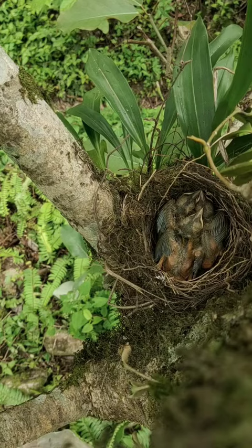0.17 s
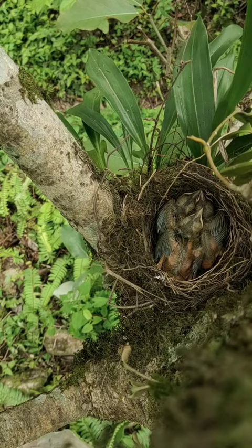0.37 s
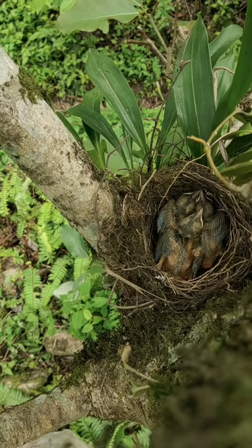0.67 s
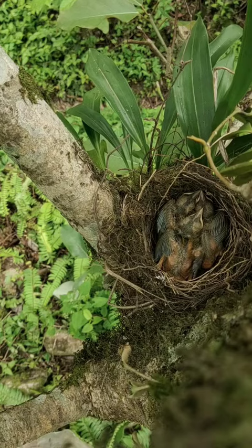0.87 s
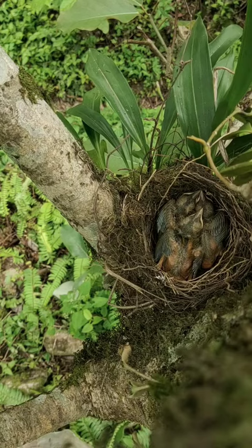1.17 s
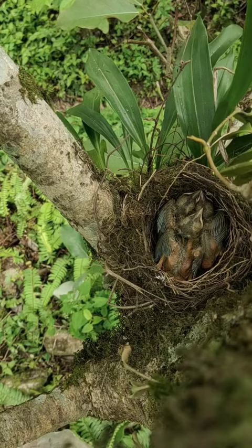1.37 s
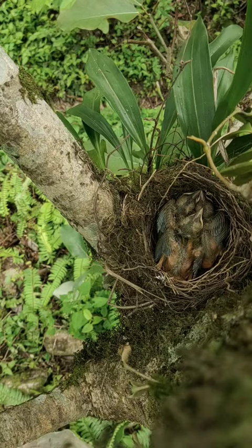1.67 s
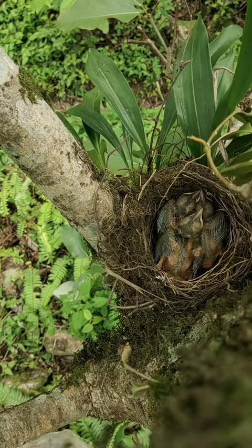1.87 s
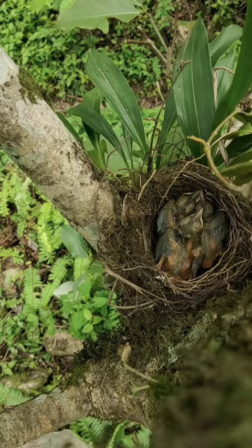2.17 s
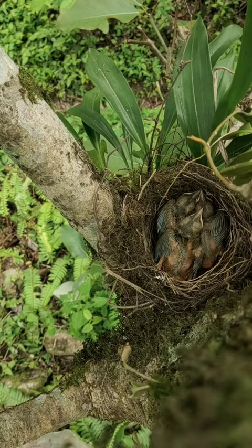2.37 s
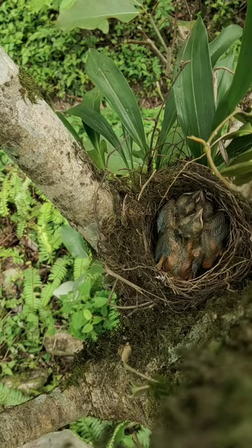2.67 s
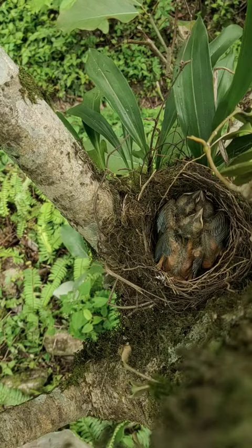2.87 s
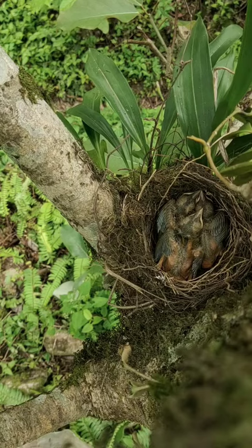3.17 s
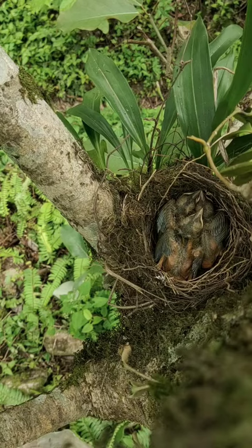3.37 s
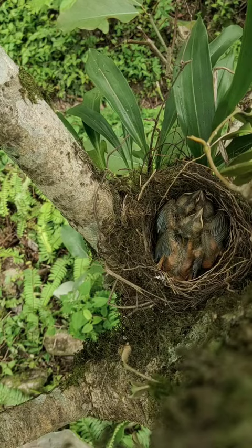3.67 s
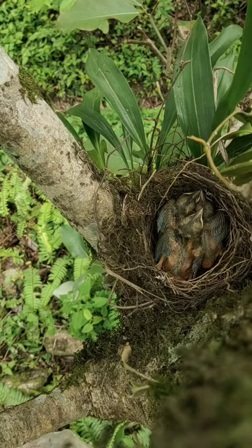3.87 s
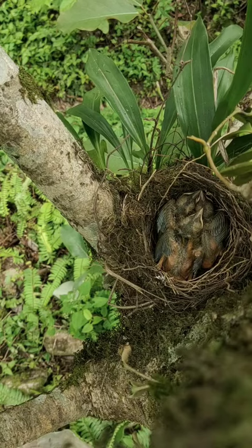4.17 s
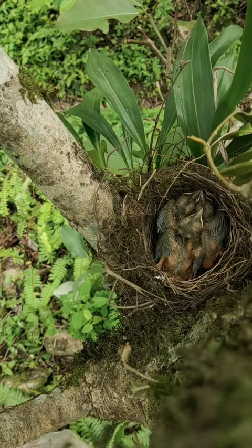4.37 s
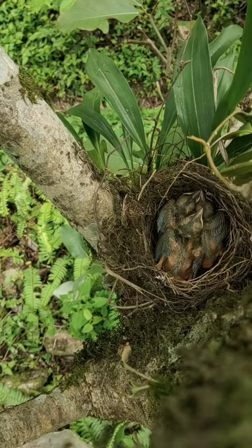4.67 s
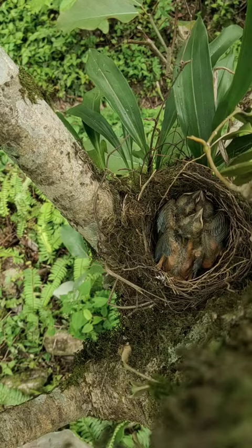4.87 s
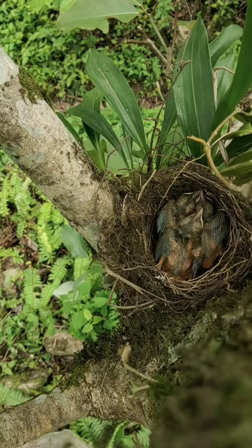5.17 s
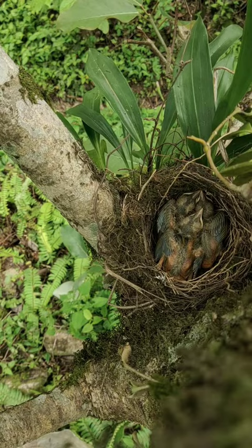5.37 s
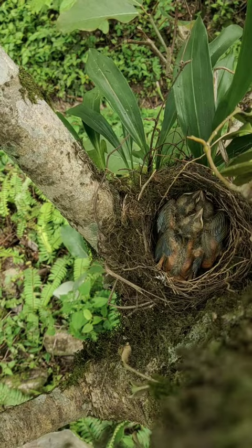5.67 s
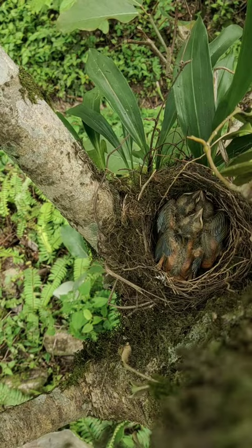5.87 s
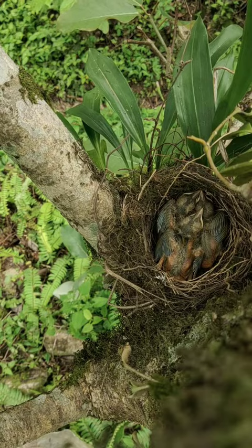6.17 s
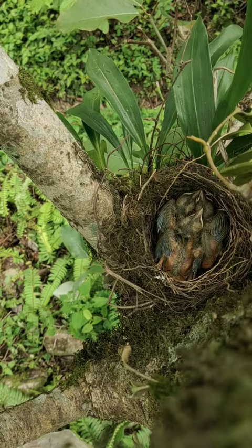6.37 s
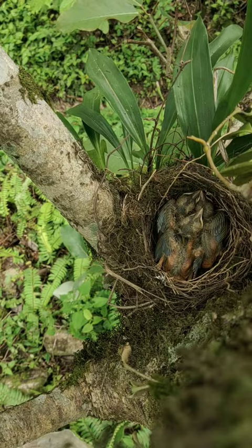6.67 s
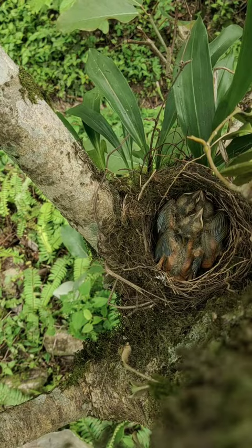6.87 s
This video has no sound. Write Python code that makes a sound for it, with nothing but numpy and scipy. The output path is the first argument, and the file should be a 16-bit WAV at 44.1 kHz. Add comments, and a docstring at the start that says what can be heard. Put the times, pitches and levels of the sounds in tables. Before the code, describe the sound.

Clear, liquid birdsong with burry notes and a thin buzz rings through echoing woodland, with faint distant birds, soft coos and dull rumble beneath.

```python
"""Songbird among echoing trees

A thrush-like bird sings whistled, warbled and buzzed notes, made from gliding tones with a swinging pitch.
Trees answer with a long echo of many random reflections; other birds call faintly further off.
Under them lie a dull rumble of filtered noise with a wavering hum, low coos and a thin pure drone.
There are also brief rustles of grainy noise and runs of very low throbs about four times a second."""
import sys
import numpy as np
from scipy import signal
from scipy.io import wavfile

SR = 44100
rng = np.random.default_rng(int(sys.argv[2]) if len(sys.argv) > 2 else 0)


def to_wav(sig):
    """Store sig (one row per channel, or 1-D mono) as 16-bit WAV at the path in sys.argv[1].

    Samples outside -1..1 are clipped; the rate is SR.
    """
    pcm = np.clip(np.atleast_2d(sig), -1, 1) * 32767
    pcm = np.round(pcm).astype(np.int16)
    wavfile.write(sys.argv[1], SR, pcm.T)  # frames by channels


N = 309141
TIME = np.arange(N) / SR
LEFT_RIGHT = np.array([[1], [-1]])   # opposite signs for the two ears


def amp(db):
    """Turns decibels into gain."""
    return 10 ** (np.asarray(db) / 20)


def rms_one(x):
    """Scales a sound to unit power."""
    return x / np.sqrt(np.mean(x ** 2) + 1e-20)


def at_time(points, seconds):
    """Reads a level curve at the given times."""
    return np.interp(seconds, *np.transpose(points))


def at_hz(points, hz):
    """Reads a spectrum on a log-frequency axis."""
    table_hz, values = np.transpose(points)
    return np.interp(np.log(hz), np.log(table_hz), values)


def lean_gain(db):
    """Gains for the two ears that make the left louder than the right by db."""
    return amp(db / 2 * LEFT_RIGHT)


def stereo(mid, side, alike):
    """Mixes two independent noises so that left and right are alike by the given share."""
    return np.sqrt(1 + alike) * mid + np.sqrt(1 - alike) * side * LEFT_RIGHT


def low_pass(x, hz):
    """Keeps the sound below hz."""
    return signal.sosfilt(signal.butter(2, hz, fs=SR, output="sos"), x)


def drift(rate, size=N):
    """Smooth random wander of spread 1 that changes about rate times a second."""
    r = np.exp(-2 * np.pi * rate / SR)
    noise = rng.standard_normal(size + 9000)
    return rms_one(signal.lfilter([1], [1, -2 * r, r * r], noise)[9000:])   # skips the filter's start


def shaped(rows, shape):
    """Spells out notes: pitch bends through three values; level attacks, swells to a peak, fades, releases."""
    attack, release, edge_db, swell_db, fade_db = shape
    notes = []
    u = np.linspace(0, 1, 41)   # position within the note
    for start, length, first, middle, last, db, share, depth in rows:
        hz = np.polyval(np.polyfit([0, .5, 1], [first, middle, last], 2), u)
        swell = swell_db * (1 - u / share) ** 2
        fade = fade_db * ((u - share) / (1 - share)) ** 2
        level = db - np.where(u < share, swell, fade)
        attack_dip = np.clip(1 - u * length / attack, 0, 1)
        release_dip = np.clip(1 - (1 - u) * length / release, 0, 1)
        level = level - edge_db * (attack_dip + release_dip)
        notes.append(np.transpose([start + u * length, hz, level, depth + 0 * u]))
    return notes


def span(rows):
    """Gives a note's sample range, its columns drawn out in time, and soft edges."""
    s, *columns = np.transpose(rows)
    where = slice(int(s[0] * SR), min(int(s[-1] * SR), N))
    t = TIME[where]
    edge = np.clip(np.minimum(t - s[0], s[-1] - t) / 0.0013, 0, 1)
    return where, [np.interp(t, s, c) for c in columns], edge


# What the open beak adds to each overtone's level: (frequency [Hz], level change [dB])
BEAK_GAIN = [(3000, -15.5), (4500, -13), (5500, -10), (7000, -2.5), (10000, 5.5)]


def whistle(notes, warble_hz, unsteady, overtones_db, rasp):
    """A membrane near a pure tone; its tension wobbles, which swings the pitch up and down."""
    out = np.zeros(N)
    for rows in notes:
        where, (hz, db, depth), edge = span(rows)
        turn = np.cumsum(warble_hz * (1 + unsteady * drift(30, size=len(hz)))) / SR
        # slow one way, quick back; a negative depth turns it upside down
        swing = signal.sawtooth(2 * np.pi * turn, .7)
        swing = swing + rasp * np.tanh(drift(417, size=len(hz)))   # fast uneven flutter roughens a trill
        phase = 2 * np.pi * np.cumsum(hz + depth * swing) / SR
        tone = np.sin(phase)
        for k, overtone_db in enumerate(overtones_db, 2):
            tone = tone + amp(overtone_db + at_hz(BEAK_GAIN, k * hz)) * np.sin(k * phase)
        out[where] += np.sqrt(2) * amp(db) * edge * tone
    return out


# Loudness of the background: (time [s], level [dB])
BACKGROUND_LEVEL = [(.035, -110), (.056, -63), (.062, -55), (2, -56.5), (4.05, -56), (4.3, -52), (5.5, -53),
                    (7, -52)]


def background():
    """Rumble and hum share one slowly changing loudness."""
    return amp(at_time(BACKGROUND_LEVEL, TIME)) * (rumble(patchy_db=0.9) + hum())


# Spectrum of the rumble, before it is scaled to unit power: (frequency [Hz], level [dB per Hz])
RUMBLE_SPECTRUM = [(21, -41.5), (35, -4.5), (49, -3), (202, -7.5), (343, -12), (492, -12), (656, -14),
                   (1010, -16.5), (1840, -32), (2460, -33), (3790, -30.5), (5560, -39), (10100, -44.5),
                   (10900, -24), (14200, -83), (22000, -120)]
# How alike the two ears are: (frequency [Hz], likeness [0 to 1])
RUMBLE_LIKENESS = [(60, 0.76), (130, 0.6), (260, 0.67), (550, 0.31), (1160, 0.58), (2430, 0.19), (5090, .3),
                   (10700, 0.63)]
# How much louder the left is: (frequency [Hz], left minus right [dB])
RUMBLE_LEAN = [(60, 5.5), (220, 3.5), (800, 1), (2920, 0.5), (10700, 0.0)]


def rumble(patchy_db):
    """Third-octave bands of noise, each with its own level, likeness and lean; all flicker together."""
    out = 0
    edges = 28 * 2 ** (np.arange(27) / 3)
    white = rng.standard_normal((2, 2, N))   # neighbouring bands take different noise
    flicker = drift(5.3)
    for k, (low, high) in enumerate(zip(edges, edges[1:])):
        band = signal.butter(2, [low, high], "band", fs=SR, output="sos")
        mid, side = signal.sosfilt(band, white[k % 2])
        hz = np.sqrt(low * high)
        alike = np.clip(at_hz(RUMBLE_LIKENESS, hz), 0, 1)
        gain = amp(at_hz(RUMBLE_SPECTRUM, hz)) * lean_gain(at_hz(RUMBLE_LEAN, hz))
        out = out + gain * stereo(mid, side, alike)
    return rms_one(out) * amp(patchy_db * flicker)


# Hum tones: (frequency [Hz], width [Hz], level over the background level [dB])
HUM_TONES = [(100.8, 6.2, -13.5), (197, 4.8, -14.5), (492.4, 26, -16.5)]


def hum():
    """Narrow wavering tones: noise through sharp resonances."""
    out = 0
    for hz, width, db in HUM_TONES:
        r = np.exp(-np.pi * width / SR)
        noise = np.diff(rng.standard_normal(N + 1))
        tone = signal.lfilter([1], [1, -2 * r * np.cos(2 * np.pi * hz / SR), r * r], noise)
        out = out + amp(db) * rms_one(tone)
    return out


DRONE_HZ = 596.3
# Peak level of the drone before its slow wander: (time [s], level [dB])
DRONE_LEVEL = [(.05, -130), (.07, -89), (2, -80), (2.5, -78.5), (4, -65.5), (4.4, -69), (7, -63)]


def drone():
    """A faint pure tone that comes forward, its strength wandering slowly."""
    level = at_time(DRONE_LEVEL, TIME) + 1.5 * drift(1.1)
    return amp(level) * np.sin(2 * np.pi * DRONE_HZ * TIME)


FAR_PEAK_SHARE = 0.61   # share of a call's length before its peak
# (attack [s], release [s], depth of both [dB], swell up to the peak [dB], fade after it [dB])
FAR_SHAPE = (.005, .01, 2, 5, 12)
FAR_TREMBLE_DB = 2.5
# Far calls, before the tremble:
# (start [s], length [s], first pitch [Hz], last pitch [Hz], peak level [dB], trill depth [Hz])
FAR_CALLS = [(0.065, 0.07, 3600, 3090, -73, 303), (0.264, .18, 4310, 3046, -70.5, 394),
             (0.588, 0.072, 3880, 4610, -65, 303), (.65, 0.052, 3100, 3510, -64, 220),
             (1.372, 0.19, 3550, 3080, -64.5, 78), (1.881, 0.064, 4370, 4470, -70, 92.5),
             (1.974, 0.056, 3520, 4220, -65, 395), (2.269, 0.064, 4720, 4480, -67.5, 300),
             (2.32, .05, 3530, 3320, -61.5, 349), (2.916, 0.11, 2760, 2640, -67.5, 5),
             (3.154, 0.049, 3360, 4030, -57, 251), (4.128, .06, 5300, 4880, -71, 700),
             (4.137, 0.15, 4350, 4000, -69.5, 450), (4.27, .16, 3590, 3150, -73, 250),
             (4.548, 0.05, 3690, 4720, -71, 200), (4.595, 0.063, 2985, 3430, -67.5, 198),
             (5.131, .13, 4970, 4660, -81, 480), (5.334, 0.077, 2390, 2350, -76, 96),
             (5.401, 0.2, 4300, 2800, -65, 508), (5.75, 0.054, 2750, 2400, -67, 198),
             (6.058, 0.073, 3736, 3730, -68, -6), (6.228, 0.067, 3740, 3710, -74, -3),
             (6.331, 0.11, 5670, 5000, -73, 500), (6.41, .16, 4490, 3620, -67.5, 497),
             (6.587, 0.087, 3740, 3790, -69, -4), (6.735, 0.045, 3800, 3800, -71.5, 0)]


def far_birds():
    """Straight glides, most with a rough trill, broken up by the moving air on the way."""
    rows = [(s, length, first, (first + last) / 2, last, db, FAR_PEAK_SHARE, depth)
            for s, length, first, last, db, depth in FAR_CALLS]
    calls = whistle(shaped(rows, FAR_SHAPE), 55, .3, [], rasp=.7)
    return calls * amp(FAR_TREMBLE_DB * drift(9))


# Echoes off two big trunks: (left delay [s], right delay [s], level [dB])
TRUNK_ECHOES = [(0.018, 0.017, -13.5), (.027, 0.021, -18)]


def trunks(x):
    """Whole copies of the sound, a little late and different at each ear."""
    out = 0
    for left, right, db in TRUNK_ECHOES:
        out = out + amp(db) * np.array([np.interp(TIME - s, TIME, x, left=0) for s in (left, right)])
    return out


def scattered(x, shape, share, alike):
    """A stereo cloud of random echoes; share is the chance of an echo at each sample."""
    hits = rng.random(len(shape)) < share
    mid, side = rng.standard_normal((2, len(shape))) * hits * shape
    cloud = stereo(mid, side, np.clip(alike, 0, 1))
    return signal.fftconvolve(x[None], cloud / np.sqrt(2 * share), axes=1)[:, :N]


SCATTER_S, BRANCHES_ALIKE = .015, 0.095   # time for echoes to fade to 1/e, left-right likeness


def branches(x):
    """Sparse echoes off nearby branches and the ground, fading within a few hundredths of a second."""
    shape = np.exp(-np.arange(int(.1 * SR)) / SR / SCATTER_S)
    return scattered(x, shape / np.sqrt(np.sum(shape ** 2)), 1 / 40, BRANCHES_ALIKE)


TREES_T60_S, TREBLE_T60_S = 0.89, 0.64   # time to fall by 60 dB, below and above TREBLE_HZ
TREBLE_HZ, TREES_ALIKE = 4570, 0.53


def trees(x):
    """Trunks and leaves further off give a dense tail; leaves soak up the treble sooner."""
    t = np.arange(int(1.2 * SR)) / SR
    low = low_pass(x, TREBLE_HZ)
    high = signal.sosfilt(signal.butter(2, TREBLE_HZ, "high", fs=SR, output="sos"), x)
    norm = np.sqrt(np.sum(amp(-60 * t / TREES_T60_S) ** 2))
    out = 0
    for part, t60 in [(low, TREES_T60_S), (high, TREBLE_T60_S)]:
        out = out + scattered(part, amp(-60 * t / t60) / norm, 1.0, TREES_ALIKE)
    return out


COO_PEAK_SHARE = 0.36   # share of a coo's length before its peak
COO_SHAPE = (.02, .02, 3, 8.9, 7)   # columns as in FAR_SHAPE
# Low coos, perhaps a distant dove, before the tremble:
# (start [s], length [s], first pitch [Hz], last pitch [Hz], peak level [dB])
COO_NOTES = [(.1, 0.21, 529, 486, -66.5), (.75, 0.25, 485, 499, -64), (1.05, 0.6, 468, 466, -67),
             (1.47, .35, 484, 468, -63.5), (1.97, 0.28, 466, 454, -66.5), (2.3, 0.42, 500, 475.6, -68.5),
             (2.95, 0.2, 509, 484, -68), (3.6, 0.57, 495, 478, -70.5), (4.3, .35, 495, 501, -65.5),
             (4.7, 0.18, 500, 554, -64.5), (5.03, .39, 502, 474.6, -65.5), (5.68, 0.38, 495, 516, -67),
             (6.45, 0.34, 496, 488.5, -63)]


def coo():
    """Soft low pure notes that tremble in strength, with their echo."""
    rows = [(s, length, first, (first + last) / 2, last, db, COO_PEAK_SHARE, 0)
            for s, length, first, last, db in COO_NOTES]
    notes = whistle(shaped(rows, COO_SHAPE), 5, 0, [], rasp=0) * amp(4 * drift(12))
    return notes + amp(-7.5) * trees(notes)


THROB_RISE_S, THROB_FALL_S, THROB_LEAK_HZ = 0.031, 0.03, 1.5
THROB_OVER_DB, THROB_UNEVEN_DB = 16, 1   # push height over the background level before the leak, its scatter
# Runs of throbs: (first push [s], period [s], number of pushes)
THROB_TIMES = [(.19, .2561, 21), (5.543, .2555, 6)]


def throb():
    """Regular slow pressure pushes; pressure leaks away, so each swings under zero afterwards."""
    out = np.zeros(N)
    for first, period, count in THROB_TIMES:
        for s in first + period * np.arange(count):
            db = at_time(BACKGROUND_LEVEL, s) + THROB_OVER_DB + THROB_UNEVEN_DB * rng.standard_normal()
            x = np.where(TIME < s, (s - TIME) / THROB_RISE_S, (TIME - s) / THROB_FALL_S)
            out += amp(db) * np.cos(np.pi * np.clip(x, 0, 1) / 2) ** 2
    return signal.sosfilt(signal.butter(1, THROB_LEAK_HZ, "high", fs=SR, output="sos"), out)


WARBLE_HZ = 37.26
# Note outline of the singer, columns as in FAR_SHAPE
SINGER_SHAPE = (0.0026, 0.0026, 5.4, 25.3, 13.8)
# Second, third and fourth partial against the first, before the beak: (level [dB] each)
SONG_PARTIALS = [-21.5, -32.5, -37]
# The singer's notes, before the tremble: (start [s], length [s], first, middle and last pitch [Hz],
# peak level [dB], share of the length before the peak, warble depth [Hz])
SONG_NOTES = [(.986, 0.032, 1750, 1733, 1690, -52, .3, 0), (1.012, 0.048, 1678, 1679, 1670, -45.5, 0.21, 1),
              (1.054, 0.028, 1617, 1630, 1390, -45.5, .35, 0),
              (1.134, 0.046, 3040, 2937, 2130, -40, 0.75, -2),
              (1.178, 0.024, 2264, 2090, 1920, -37.5, 0.31, 2),
              (1.207, 0.027, 1893, 1904, 2010, -36.5, 0.25, 4),
              (1.23, 0.027, 2004, 1937, 1680, -38, .35, 4), (1.312, 0.058, 2110, 2280, 2303, -39.5, .6, 2),
              (1.367, 0.019, 2325, 2374, 2450, -36.5, 0.5, 2),
              (1.383, .155, 2370, 2430, 1988, -37, 0.15, 177),
              (1.573, 0.024, 2165, 2290, 2330, -45.5, .3, 2),
              (2.107, 0.049, 2353, 2403, 2360, -47, 0.11, -6), (2.297, 0.037, 2043, 1920, 2050, -34, .7, 0),
              (2.34, 0.08, 2050, 2146, 2180, -35.5, 0.28, 3),
              (2.392, 0.049, 2088, 2215, 2200, -35.5, 0.41, 10),
              (2.44, .022, 2130, 2120, 2160, -37.5, 0.79, -6),
              (2.543, 0.025, 2098, 1915, 1580, -35, 0.2, -2),
              (2.578, 0.026, 1640, 1618, 1630, -40.5, 0.57, -1),
              (2.606, 0.022, 1830, 1772, 1696, -37.5, 0.64, -2),
              (6.49, 0.057, 2247, 2270, 2190, -39, 0.89, -3),
              (6.543, 0.04, 2184, 2000, 1600, -33.5, 0.15, -9),
              (6.76, 0.045, 1930, 1810, 1720, -33.5, 0.54, 3),
              (6.808, 0.088, 1710, 1685, 1770, -36, 0.17, -9),
              (6.874, 0.013, 1870, 2024, 1950, -36, 0.41, -2),
              (6.891, 0.017, 1920, 2500, 2990, -39, 0.38, -2),
              (6.911, 0.038, 2340, 2725, 2780, -39.5, 0.37, 1),
              (6.936, 0.015, 2370, 2640, 2750, -39, 0.5, -2),
              (6.943, 0.14, 2740, 2650, 2624, -40.5, 0.087, -5)]


def song():
    """Clear whistles with overtones, one of them with a deep warble."""
    return whistle(shaped(SONG_NOTES, SINGER_SHAPE), WARBLE_HZ, .03, SONG_PARTIALS, rasp=.25)


FLUTTER_HZ = 111.2
# Partials of the burry notes, as in SONG_PARTIALS: (level [dB] each)
BURRY_PARTIALS = [-19.5, -37.5, -33]
# The singer's burry notes, columns as in SONG_NOTES with flutter depth [Hz] last
BURRY_NOTES = [(1.636, 0.22, 3891, 2975, 2013, -36.5, 0.29, 29.8),
               (1.977, 0.031, 2917, 2577, 1860, -38.5, 0.37, 128),
               (2.002, .038, 1860, 2158, 3030, -41, 0.72, 230),
               (2.038, 0.048, 2655, 2138, 1850, -39, 0.14, 170),
               (2.496, 0.018, 2840, 2670, 2520, -39.5, 0.53, 180),
               (2.51, .036, 3046, 2710, 2140, -37.5, 0.58, 233)]


def burry_notes():
    """A fast, uneven swing of the pitch makes these notes burr."""
    return whistle(shaped(BURRY_NOTES, SINGER_SHAPE), FLUTTER_HZ, .2, BURRY_PARTIALS, rasp=.5)


TRILL_HZ, THIN_OVERTONE_DB, BUZZ_PULSE_DB = 152.2, -17.5, 2.5
# Note outline, columns as in FAR_SHAPE
THIN_OUTLINE = (.004, .006, 4, 10, 12)
# Thin two-voiced notes and the buzz after them, columns as in SONG_NOTES with trill depth [Hz] last
THIN_NOTES = [(2.688, 0.07, 7800, 7240, 6870, -50, 0.8, 80),
              (2.70, 0.076, 6550, 6150, 5480, -49, 0.53, 152),
              (2.813, 0.048, 3900, 4190, 4350, -55, .35, 348),
              (2.865, 0.069, 4064, 4605, 4530, -49.5, 0.49, 755),
              (2.925, 0.068, 4600, 5430, 5080, -51, 0.35, 1130),
              (2.995, .065, 5100, 5270, 4840, -49, 0.23, 1060)]


def thin_notes():
    """High thin tones, then a buzz from a wide fast trill, all uneven in strength."""
    notes = whistle(shaped(THIN_NOTES, THIN_OUTLINE), TRILL_HZ, .3, [THIN_OVERTONE_DB], rasp=.6)
    return notes * amp(BUZZ_PULSE_DB * drift(65))


DOUBLE_JITTER_HZ = 25.2
# A drawn-out call from both halves of the bird's voice organ at once:
# (time [s], low voice [Hz], high voice [Hz], level [dB])
DOUBLE_VOICES = [(3.165, 1700, 2540, -61), (3.185, 1986, 2780, -55), (3.21, 2188, 2934, -50),
                 (3.27, 2290, 2932, -49), (3.36, 2356, 2986, -49.5), (3.43, 2373, 2953, -54.5),
                 (3.5, 2420, 2860, -67)]
# The tones the coupled voices make: (times low, times high, level [dB])
VOICE_MIXES = [(1, 0, 0.9), (0, 1, -2), (1, 1, -20), (-1, 2, -18), (2, -1, -23.5), (2, 0, -24.5)]


def double_call():
    """Two unsteady voices in one throat give sum and difference tones."""
    where, (low, high, db), edge = span(DOUBLE_VOICES)
    jitter = DOUBLE_JITTER_HZ * np.array([drift(48, size=len(low)), drift(33, size=len(low))])
    low_phase, high_phase = 2 * np.pi * np.cumsum([low, high] + jitter, axis=1) / SR
    tones = 0
    for m, n, mix_db in VOICE_MIXES:
        tones = tones + amp(mix_db) * np.sin(round(m) * low_phase + round(n) * high_phase)
    out = np.zeros(N)
    out[where] = np.sqrt(2) * amp(db) * edge * tones
    return out


RUSTLE_LOW_HZ, RUSTLE_HIGH_HZ = 1275, 2590
# Puffs of rustle: (time [s], level [dB], half length [s])
RUSTLE_PUFFS = [(5.51, -64, 0.024), (5.555, -56.5, 0.017), (5.594, -60, 0.016), (5.63, -53, 0.018),
                (6.732, -57.5, 0.05), (6.806, -57.5, 0.054)]


def rustle():
    """A few short puffs of grainy noise in the low treble."""
    shape = sum(amp(db) * np.exp(-((TIME - s) / half) ** 2) for s, db, half in RUSTLE_PUFFS)
    grains = rng.standard_normal(N) * amp(2.0 * drift(270))
    band = signal.butter(4, [RUSTLE_LOW_HZ, RUSTLE_HIGH_HZ], "band", fs=SR, output="sos")
    return shape * rms_one(signal.sosfilt(band, grains))


SONG_TREMBLE_DB, TREMBLE_HZ = 1.3, 49
SINGER_LEAN_DB, DIRECT_DULL_HZ = 1.5, 4500
SINGER_ECHO_DB, NEAR_SCATTER_DB, FAR_DIRECT_DB = -3.5, -5, -2


def scene():
    """Near sounds and far birds, both with echoes, over the background, coos, drone and throb."""
    near = (song() + burry_notes()) * amp(SONG_TREMBLE_DB * drift(TREMBLE_HZ))
    near = near + thin_notes() + double_call() + rustle()
    far = far_birds()
    # foliage blocks the straight path more for high tones
    direct = low_pass(near, DIRECT_DULL_HZ) + amp(FAR_DIRECT_DB) * far
    echoes = trunks(direct)
    echoes = echoes + branches(amp(NEAR_SCATTER_DB) * near + amp(-5.0) * far)
    echoes = echoes + trees(amp(SINGER_ECHO_DB) * near + far)
    birds = lean_gain(SINGER_LEAN_DB) * (direct + echoes)
    return birds + background() + coo() + drone() + throb()


TOP_HZ = 11050   # from here up the treble is at least 50 dB down


def record(dry):
    """The top is cut steeply."""
    return signal.sosfilt(signal.cheby2(16, 50, TOP_HZ, fs=SR, output="sos"), dry)


dry = scene()
out = record(dry)
to_wav(out)
```